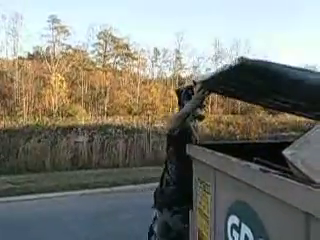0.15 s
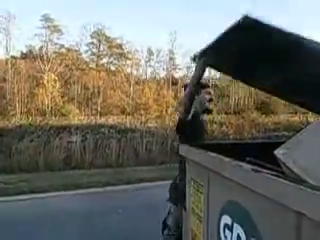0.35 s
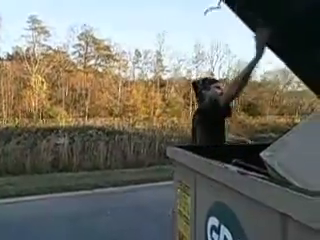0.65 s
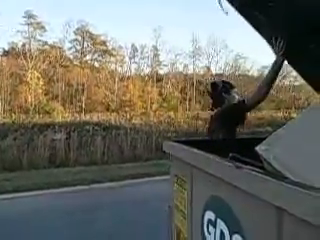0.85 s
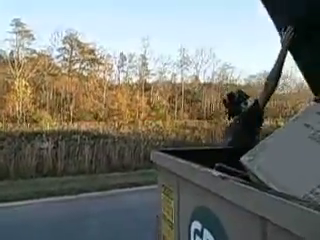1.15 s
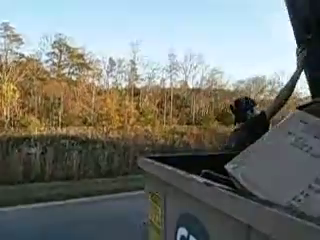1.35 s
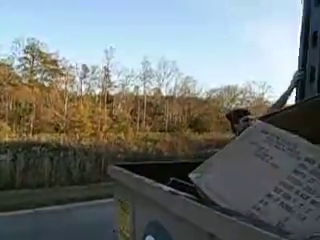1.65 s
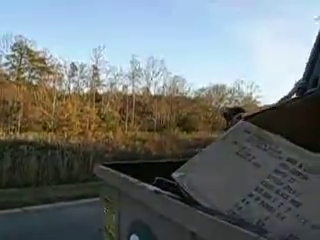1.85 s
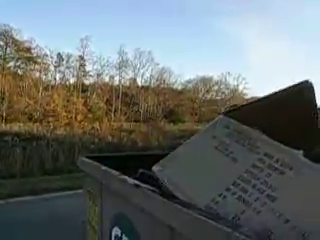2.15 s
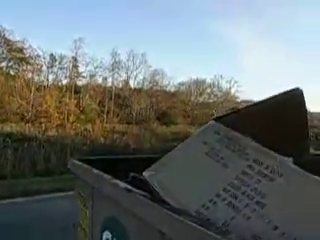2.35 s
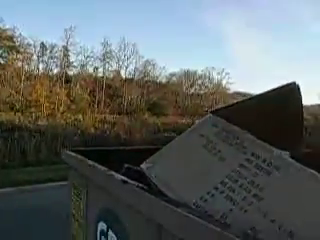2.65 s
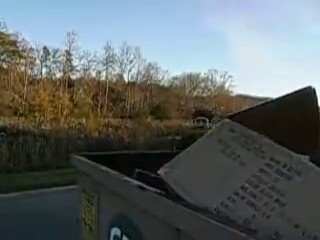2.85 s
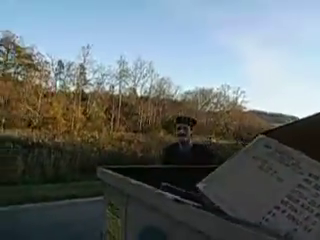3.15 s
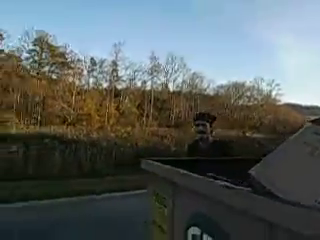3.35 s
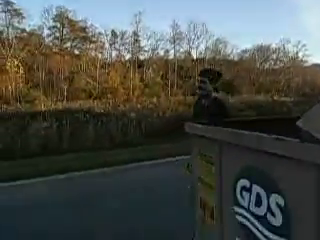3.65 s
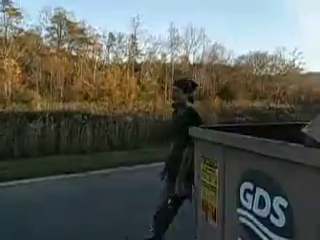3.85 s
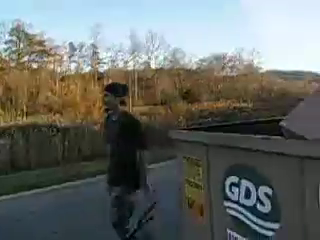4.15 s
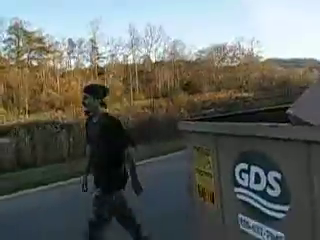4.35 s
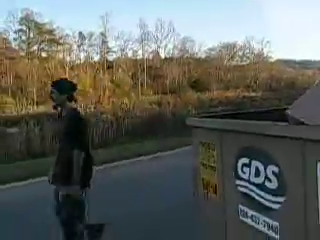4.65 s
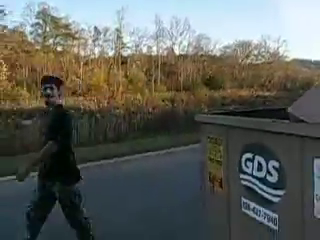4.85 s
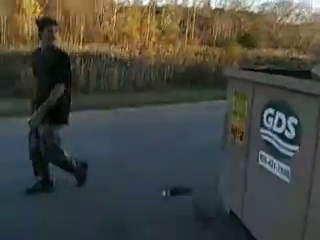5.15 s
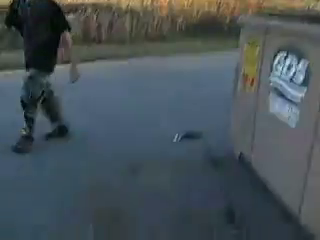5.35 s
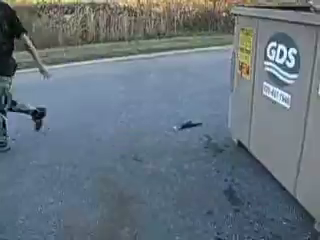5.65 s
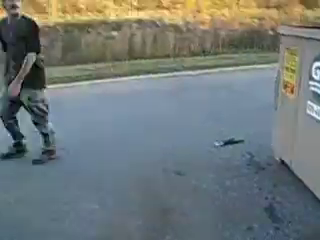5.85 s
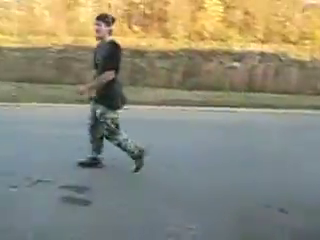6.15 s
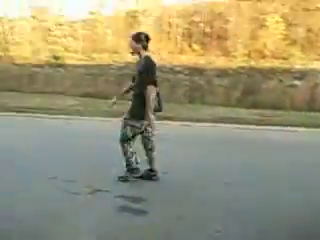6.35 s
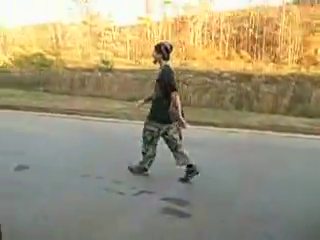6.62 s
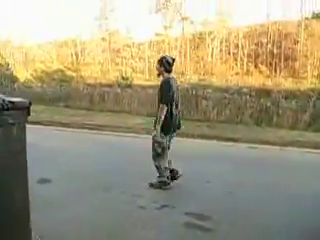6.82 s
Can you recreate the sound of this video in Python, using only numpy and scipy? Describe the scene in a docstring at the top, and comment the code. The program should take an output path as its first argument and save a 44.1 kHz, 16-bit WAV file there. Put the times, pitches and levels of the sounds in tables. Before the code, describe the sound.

A dumpster lid bangs and clatters loudly against its hollow steel bin outdoors, then a small object drops and fingers knock the microphone.

```python
"""First comes a swish of clothes, then a dumpster lid bangs and clatters against its steel bin, outdoors,
as it is pushed up, swung over and let down. Each blow rings the lid and makes the hollow bin boom.
A small hard object drops on the asphalt and bounces, someone walks off, and fingers knock and rub on
the camera. Far traffic hums behind; the narrow-band recorder overloads on the loud blows."""
import sys
import numpy as np
from scipy import signal
from scipy.fft import rfft, irfft, next_fast_len
from scipy.io import wavfile
from scipy.ndimage import uniform_filter1d

SR = 44100
rng = np.random.default_rng(int(sys.argv[2]) if len(sys.argv) > 2 else 0)


def int16_out(signal):
    """Quantize to a 16-bit WAV file."""
    q = np.round(np.clip(np.atleast_2d(signal).T, -1, 1) * 32767)
    wavfile.write(sys.argv[1], SR, q.astype(np.int16))


N = 307947
AGE = np.arange(SR // 2) / SR   # seconds since a blow


# Blows of the lid: start_s, level_db, pitch_hz, crack_db, settle_s (time for rebounds to lose 20 dB)
LID_BLOWS = [(0.202, -22, 620, -38, .04), (0.470, -22, 600, -25, .04), (0.507, -19, 470, -34, .045),
             (0.718, -22.5, 580, -19, .05), (0.756, -12, 540, -29, .028), (0.829, -23, 650, -23, .05),
             (0.852, -21, 680, -19, .1), (1.205, -21, 540, -23, .04), (1.245, -14.5, 460, -25, .05),
             (1.397, -11, 625, -19, .022), (1.412, -2, 570, -19.5, .036), (1.445, -14, 580, -24, .04),
             (1.471, -16, 680, -24, .025), (1.925, -15.5, 760, -11, .05), (1.94, -9, 680, -18, .11),
             (2.095, -11.5, 760, -27, .03), (2.118, -10.5, 800, -25, .022), (2.140, -1, 840, -19, .085),
             (2.373, -21.5, 630, -35, .06), (2.577, -13.5, 500, -29, .07), (2.632, -9, 540, -30, .1),
             (2.719, -13, 720, -25, .075), (2.759, -2, 680, -23, .11), (2.782, -2, 1280, -18, .12),
             (2.823, -7, 540, -20, .085), (2.901, -3.5, 430, -29, .095), (2.96, -12, 260, -34, .06),
             (3.104, -19, 516, -35, .04), (3.191, -22, 400, -42, .06), (3.256, -26, 450, -28, .07),
             (3.492, -21, 786, -25, .05), (3.516, -19, 380, -25, .07), (3.56, -21, 520, -25, .07)]

def lid_bangs(mode_hz, rings, focus=2.3, rebound_s=.023, dulling=.92):
    """The lid hits steel and bounces back, each time weaker and duller, with a crack from its edge."""
    treble = 1 / (1 + (1450 / mode_hz) ** 6)   # only the hard edge reaches the high tones
    edge = treble * (2000 / mode_hz) ** 1.1
    build = 1 - fade(.0092)[:rings.shape[1]]   # bending waves take a moment to cross the lid
    out = np.zeros(N)
    for start_s, level_db, pitch_hz, crack_db, settle_s in LID_BLOWS:
        buzz_s = .33 * settle_s
        for k in range(4):   # the blow and three rebounds
            late_s = k * rebound_s * rng.uniform(.9, 1.1)
            centre_hz = pitch_hz * dulling ** k   # the spot struck favours tones near this pitch
            near = (1 - treble) / np.hypot(1, focus * (mode_hz / centre_hz - centre_hz / mode_hz))
            body = from_db(-2) * crest_one(build * buzzing(rings, near, buzz_s))
            crack = from_db(5 + crack_db - 2 * k) * crest_one(build * buzzing(rings, edge, buzz_s))
            add(out, start_s + late_s, from_db(level_db - 20 * late_s / settle_s) * (body + crack))
    return out


# Modes (natural tones) of lid and bin: pitch_hz, level_db, ring_s (time to fade by 60 dB)
LID_MODES = [(176, -3, 0.21), (211, -6, 0.093), (255.6, 2, 0.66), (268.5, -4.5, 0.54), (360, -1, 0.28),
             (422, -28, 0.14), (469, -3.5, 0.1), (511.8, 0, 0.15), (565, -12, 0.21), (616, 9.5, 0.047),
             (744, 4.5, 0.047), (760, 9, 0.1), (876, 5.5, 0.11), (1010, 5, 0.091), (1095, 4.5, 0.05),
             (1440, -3, .1), (2390, 2, 0.044)]

def lid_tones():
    """The lid rings with a few main tones and a crowd of brief ones; gives their pitches and sounds."""
    crowd_hz = np.linspace(np.sqrt(110), np.sqrt(4200), num=220) ** 2 * rng.uniform(.99, 1.01, 220)
    modes = LID_MODES + [(hz, -2, .069 * (700 / hz) ** .62) for hz in crowd_hz]
    return np.array(modes)[:, 0], ringing(modes)[:, :SR // 4]


# The lid drags on its hinge, then tips over: peak_s, level_db, rise_s, fall_s
HINGE_DRAGS = [(0.95, -32, 1.4, .55), (2.06, -28, .2, .12), (2.27, -36, .1, .3)]

def lid_drag_and_shudder(mode_hz, rings):
    """Tiny slips at the hinge make the lid groan, and it goes on shaking after every blow."""
    damped = rings * fade(.14)[:rings.shape[1]]   # rubbing cuts the long tones short
    slip = strike(damped, 1 / np.hypot(1, mode_hz / 600))[0]
    drag = signal.fftconvolve(grains(per_s=570), slip)[:N]
    groan = resonate(drag, hz=247, width_hz=44)   # the whole lid hums as it turns
    blows = [(start_s, level_db - 22.5) for start_s, level_db, *_ in LID_BLOWS]
    shudder = aftermath(blows, rise_s=.12, ring_s=.65)
    turning = sum(swell(*row) for row in HINGE_DRAGS)
    return np.hypot(shudder, turning) * rms_one(rms_one(drag) + .65 * rms_one(groan))


# Tone colour of the air inside the bin: pitch_hz, level_db
ECHO_COLOUR = [(50, -3), (120, -15), (200, -0.5), (450, 6.5), (750, 0.5), (1100, 0), (1600, -17),
               (2600, -22), (4000, -35.5)]

def bin_echo():
    """Each blow echoes in the hollow bin."""
    echo = fade(.5) * (1 - fade(.076))
    out = np.zeros(N)
    for start_s, level_db, *_ in LID_BLOWS:
        add(out, start_s, from_db(level_db - 20) * echo * noise(ECHO_COLOUR, size=len(AGE)))
    return out


# Slow flexing of the big steel walls: pitch_hz, level_db, ring_s
WALL_MODES = [(41, -3.5, .4), (57, 2, 0.68), (73.4, -5.5, 0.16), (99, -1, 0.43), (108, -1.5, 0.24),
              (120, -23, 0.1), (182, 8, 0.46)]
# Tone colour of their rumble: pitch_hz, level_db
WALL_COLOUR = [(20, -4), (55, 2), (100, -3), (180, -8), (400, -15), (1500, -56)]

def bin_walls(landing_s=2.6, swinging_db=-26, landed_db=-12):
    """The walls boom and rumble under each blow, far more once the lid lies against them."""
    booms = [(s, db + (landed_db if s > landing_s else swinging_db)) for s, db, *_ in LID_BLOWS]
    walls = ringing(WALL_MODES)
    out = from_db(-12.5) * aftermath(booms, rise_s=.35, ring_s=1.6) * noise(WALL_COLOUR)
    for start_s, level_db in booms:
        add(out, start_s, from_db(level_db) * crest_one(strike(walls)[0]))
    return out


# The lid's edge scrapes on steel: peak_s, level_db, rise_s, fall_s
EDGE_SCRAPES = [(0.9, -49, .22, .25), (1.928, -24.5, .022, .06), (2.06, -44, .09, .06)]
# Tone colour of one slip: pitch_hz, level_db
SLIP_COLOUR = [(600, -5), (1300, 4), (1900, 1.5), (2600, 7), (3400, 5.5), (4200, -2.5)]
# Small squeaks and, at 5.478 s, a faint high ring just after the thump on the microphone:
# start_s, level_db, pitch_hz, length_s
THIN_TONES = [(0.093, -38.5, 1650, 0.031), (0.815, -42.5, 2160, 0.057), (0.884, -44.5, 1890, .035),
              (0.945, -41, 2240, 0.028), (1.087, -44, 1820, 0.015), (5.478, -44, 2420, 0.053),
              (5.966, -44, 2460, 0.022)]

def scrapes_and_thin_tones(waver=.013):
    """Dry edges scrape in fine slips; short, unsteady tones make the squeaks and one faint ring."""
    slip = noise(SLIP_COLOUR, size=len(AGE)) * fade(.012)
    scrape = rms_one(signal.fftconvolve(grains(per_s=1600), slip)[:N])
    out = sum(swell(*row) for row in EDGE_SCRAPES) * scrape
    for start_s, level_db, pitch_hz, length_s in THIN_TONES:
        wobble = rms_one(band(hiss(), 20, 300))
        phase = 2 * np.pi * np.cumsum(pitch_hz * (1 + waver * wobble)) / SR
        arch = np.sin(np.pi * np.minimum(AGE / length_s, 1))
        add(out, start_s, from_db(level_db) * arch * np.sin(phase))
    return out


# The small object hits the asphalt: start_s, level_db
OBJECT_BOUNCES = [(4.027, -29.5), (4.224, -38), (4.3144, -4.5), (4.331, -6.5), (4.346, -5), (4.3637, -4.5),
                  (4.376, -7), (4.388, -10), (4.4232, -13.5), (4.437, -20), (4.4599, -20.5), (4.6551, -13),
                  (4.7602, -24), (4.7821, -14), (4.816, -28.5)]
# Its natural tones: pitch_hz, level_db, ring_s
OBJECT_MODES = [(1015, -11, .07), (1075, -8, .08), (1760, -15, .03), (2590, -9, .04), (2635, -5, .06),
                (2695, -3, .065), (2854, 0, .05), (2980, 0, .055), (3106, -3, .04), (3240, -1, .045),
                (3395, -1, .04), (3600, 0, .035), (3774, -4, .03)]
# Tone colour of its click: pitch_hz, level_db
BOUNCE_COLOUR = [(120, -7), (400, -18), (850, -11.5), (1060, 4.5), (1300, -23), (2200, -12.5), (2750, 3.5),
                 (3400, -7.5), (4200, -22.5)]

def dropped_object(detune=.0086):
    """Each bounce is a hard click and a short bright ring."""
    scatter = from_db(-20) * fade(.22)   # the ground and the bin throw the click back
    out = np.zeros(N)
    for start_s, level_db in OBJECT_BOUNCES:
        click = crest_one(noise(BOUNCE_COLOUR, size=len(AGE)) * (fade(.028) + scatter))
        # touching the ground shifts the tones a little differently every time
        rings = ringing([(hz * rng.normal(1, detune), db, ring_s) for hz, db, ring_s in OBJECT_MODES])
        ring = crest_one(buzzing(rings, weights=1, length_s=.007))
        add(out, start_s, from_db(level_db) * (from_db(-1) * click + from_db(-5) * ring))
    return out


# Knocks on the camera: start_s, level_db, pitch_hz, ring_s, tick_db
FINGER_KNOCKS = [(5.36, -21, 860, 0.016, -9), (6.099, -12.5, 740, 0.016, -13), (6.276, -1, 790, 0.065, -12),
                 (6.34, -5, 798, 0.055, -7)]

def finger_knocks():
    """A finger ticks on the case, which rings and rattles with a dying run of smaller contacts."""
    out = np.zeros(N)
    for start_s, level_db, hz, ring_s, tick_db in FINGER_KNOCKS:
        shell = ringing([(hz, 0, ring_s), (.79 * hz, -6, ring_s / 2), (1.58 * hz, -11, ring_s)])
        contacts = .9 * grains(per_s=720, size=len(AGE)) * fade(.058)
        contacts[0] = 1   # the knock itself
        tone = crest_one(signal.fftconvolve(shell.sum(axis=0), contacts)[:len(AGE)])
        tick = crest_one(band(hiss() * fade(.026), 250, 2800, order=1))
        add(out, start_s, from_db(level_db) * (tone + from_db(tick_db) * tick))
    return out


# Thumps on the microphone: start_s, level_db, pitch_hz, ring_s, crunch_db
FINGER_THUMPS = [(5.476, 0.5, 100.5, 0.031, -11), (6.340, -1, 180, 0.01, -15)]

def finger_thumps():
    """A finger bumps the microphone: a low push with a short crunch."""
    out = np.zeros(N)
    for start_s, level_db, pitch_hz, ring_s, crunch_db in FINGER_THUMPS:
        push = -np.cos(2 * np.pi * pitch_hz * AGE) * fade(ring_s)
        crunch = crest_one(band(hiss() * fade(.014) * (1 - fade(.032)), 270, 3500))
        add(out, start_s, from_db(level_db) * (push + from_db(crunch_db) * crunch))
    return out


# Pitches the camera case favours: pitch_hz, width_hz, level_db
CASE_RESONANCES = [(580, 150, 0), (790, 340, 11), (1500, 97, 14), (2080, 300, 0.5), (2960, 1300, -26)]

def finger_rub():
    """A finger presses, slides and lifts off; its tiny slips ring the case."""
    slips = grains(per_s=3500)
    case = sum(from_db(db) * resonate(slips, hz, width_hz) for hz, width_hz, db in CASE_RESONANCES)
    return swell(peak_s=6.339, level_db=-17.2, rise_s=.08, fall_s=.016, hold_s=.046) * rms_one(case)


# Soft steps: start_s, level_db
FOOTFALLS = [(3.93, -29), (4.109, -24.5), (4.18, -23), (5.337, -25), (6.004, -28)]

def footsteps():
    """Soles land on the asphalt with a dull thud."""
    out = np.zeros(N)
    for start_s, level_db in FOOTFALLS:
        sole = hiss() * fade(.14) * (1 - fade(.027))
        add(out, start_s, from_db(level_db) * crest_one(band(sole, 220, 730)))
    return out


# Swishes of clothes: peak_s, level_db, hold_s
CLOTH_SWISHES = [(0.045, -36, .125), (1.2, -48, .1), (5.37, -46, .005), (5.66, -45, .02), (5.83, -48, .01),
                 (6.24, -43, .05), (6.47, -43, .01)]
# Their tone colour: pitch_hz, level_db
CLOTH_COLOUR = [(800, -20), (1600, -8), (2300, -7), (2900, 1), (3500, -3), (4200, -14)]

def clothes():
    """Moving cloth gives short swells of hiss."""
    motion = sum(swell(s, db, rise_s=.1, fall_s=.17, hold_s=hold_s) for s, db, hold_s in CLOTH_SWISHES)
    return motion * noise(CLOTH_COLOUR)


# Gusts of wind: peak_s, level_db
WIND_GUSTS = [(3.9, -36), (4.37, -28)]
# Their tone colour: pitch_hz, level_db
GUST_COLOUR = [(15, -3), (35, 1), (90, -3.5), (180, -8), (400, -13.5), (1500, -56)]

def wind():
    """Gusts rumble on the microphone."""
    return sum(swell(s, db, rise_s=.3, fall_s=.45) for s, db in WIND_GUSTS) * noise(GUST_COLOUR)


# Tone colour of distant traffic and air: pitch_hz, level_db
TRAFFIC_COLOUR = [(24, -28.5), (40, -2.5), (151, -2.5), (194, -7), (222, 0), (254, -9), (327, -7.5),
                  (404, -9.5), (471, -7.5), (550, -12), (582, -7), (980, -6), (1710, -25.5), (2670, -27.5),
                  (4000, -32), (5200, -63.5), (8800, -120)]

def far_traffic():
    """Distant traffic blends into a steady low hum."""
    return from_db(-35.5) * noise(TRAFFIC_COLOUR)


def from_db(db):
    """Turn decibels into a gain."""
    return 10 ** (np.asarray(db) / 20)


def rms_one(x):
    """Scale to an average (rms) level of 1."""
    return x / np.sqrt(np.mean(x ** 2) + 1e-20)


def crest_one(x):
    """Scale so that the loudest few milliseconds swing about +-1."""
    return x / np.sqrt(2 * uniform_filter1d(x ** 2, size=200).max() + 1e-20)


def fade(ring_s):
    """A gain that falls by 60 dB every ring_s."""
    return from_db(-60 * AGE / ring_s)


def swell(peak_s, level_db, rise_s, fall_s, hold_s=0):
    """A gain that climbs, holds and dies away; rise_s and fall_s are the times for 20 dB."""
    t = np.arange(N) / SR - peak_s
    away = np.maximum(-t, 0) / rise_s + np.maximum(t - hold_s, 0) / fall_s
    return from_db(level_db - 20 * np.minimum(away, 10))


def aftermath(blows, rise_s, ring_s):
    """The strength of a dying vibration that each (start_s, level_db) blow feeds."""
    age, power = np.arange(N) / SR, np.zeros(N)
    shape = (1 - from_db(-60 * age / rise_s)) * from_db(-60 * age / ring_s)
    for start_s, level_db in blows:
        add(power, start_s, (from_db(level_db) * shape) ** 2)
    return np.sqrt(power)


def add(out, start_s, sound):
    """Mix a sound in at a given time."""
    at = round(start_s * SR)
    out[at:at + len(sound)] += sound[:N - at]


def band(x, low_hz, high_hz, order=2):
    """Keep the range between two pitches."""
    return signal.sosfilt(signal.butter(order, [low_hz, high_hz], "band", fs=SR, output="sos"), x)


def resonate(x, hz, width_hz):
    """A resonance: keep what lies near one pitch."""
    r = np.exp(-np.pi * width_hz / SR)
    feedback = [1, -2 * r * np.cos(2 * np.pi * hz / SR), r * r]
    return signal.lfilter(np.array([1, 0, -1]) * (1 - r * r) / 2, feedback, x)


def hiss():
    """Half a second of white noise."""
    return rng.standard_normal(len(AGE))


def noise(colour, size=N):
    """Noise shaped by a tone colour table, at rms level 1."""
    hz, db = np.transpose(colour)
    n = next_fast_len(size)
    all_hz = np.maximum(np.fft.rfftfreq(n, 1 / SR), 1)
    gains = from_db(np.interp(np.log(all_hz), np.log(hz), db))
    return rms_one(irfft(rfft(rng.standard_normal(n)) * gains, n)[:size])


def grains(per_s, size=N):
    """Random tiny contacts of uneven strength."""
    return (rng.random(size) < per_s / SR) * rng.standard_normal(size) + 1e-18


def ringing(modes):
    """One dying tone for each (pitch_hz, level_db, ring_s) row."""
    return np.array([from_db(db) * np.sin(2 * np.pi * hz * AGE) * fade(s) for hz, db, s in modes])


def strike(rings, weights=1, spread_db=3, count=1):
    """Each contact sets off its own random mix of the tones."""
    shape = (count, len(rings))
    return (weights * from_db(rng.normal(0, spread_db, shape)) * rng.choice([-1, 1], shape)) @ rings


def buzzing(rings, weights, length_s, count=6):
    """A contact and its quick, weakening rebounds, each landing on another spot."""
    out, *rebounds = strike(rings, weights, count=count + 1)
    parts = (np.arange(count) + rng.uniform(.2, 1, count)) / count
    for rebound, part in zip(rebounds, parts):
        lag = int(np.clip(part * length_s * SR, 1, len(out) - 1))
        out[lag:] += .87 * np.exp(-1.2 * part) * rebound[:-lag]
    return out


def scene():
    """Everything meets at one microphone."""
    mode_hz, rings = lid_tones()
    lid = lid_bangs(mode_hz, rings) + lid_drag_and_shudder(mode_hz, rings)
    main = lid + bin_echo() + bin_walls() + scrapes_and_thin_tones()
    fingers = finger_knocks() + finger_thumps() + finger_rub()
    return (main + dropped_object() + fingers + footsteps() + clothes() + wind() + far_traffic())[None]


def gain_control(x, threshold_db=-9, slope=.52, attack_s=.0025):
    """Loud peaks pull the volume down; it comes back at a steady rate."""
    over_db = np.maximum(20 * np.log10(np.abs(x) + 1e-9) - threshold_db, 0)
    release = 85 * np.arange(N) / SR
    held_db = np.maximum.accumulate(over_db + release, axis=-1) - release
    r = np.exp(-1 / (attack_s * SR))
    return x * from_db(-slope * signal.lfilter([1 - r], [1, -r], held_db))


def record(dry, swing=.59, band_hz=3950, headroom=.28, knee=11, cutoff_hz=16000, offset=.465):
    """The recorder overloads, flattening upper peaks first, cuts the treble and adds a steady offset."""
    loud = np.clip(gain_control(dry), -swing, swing)
    narrow = signal.sosfilt(signal.butter(16, band_hz, fs=SR, output="sos"), loud)
    flattened = narrow / (1 + (np.maximum(narrow, 0) / headroom) ** knee) ** (1 / knee)
    return offset + signal.sosfilt(signal.butter(14, cutoff_hz, fs=SR, output="sos"), flattened)


dry = scene()
out = record(dry)
int16_out(out)
```